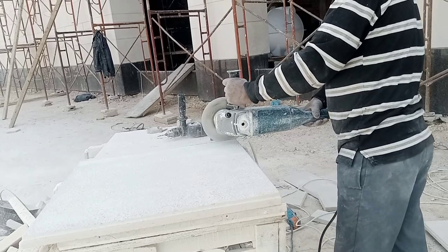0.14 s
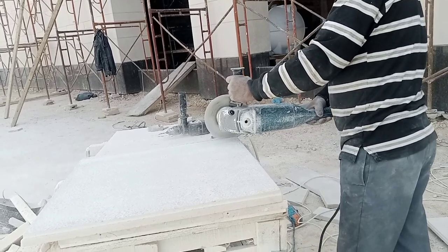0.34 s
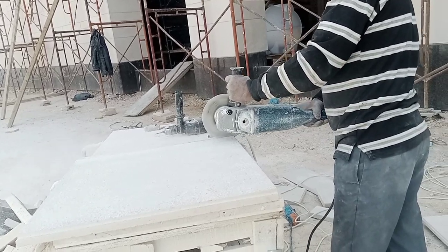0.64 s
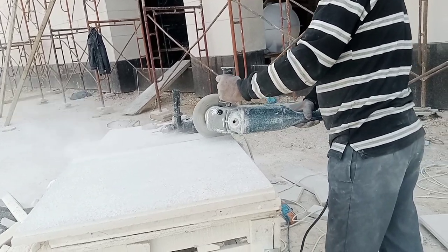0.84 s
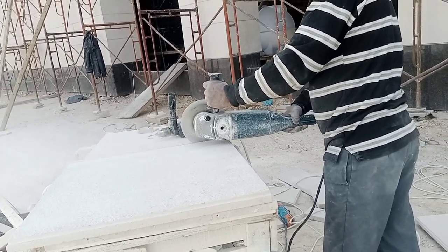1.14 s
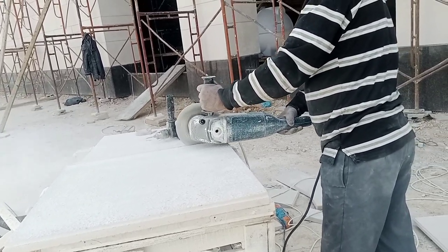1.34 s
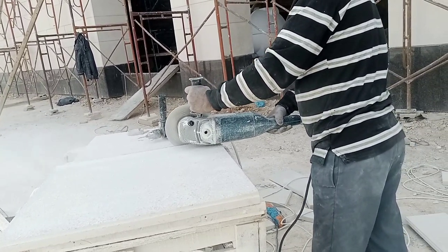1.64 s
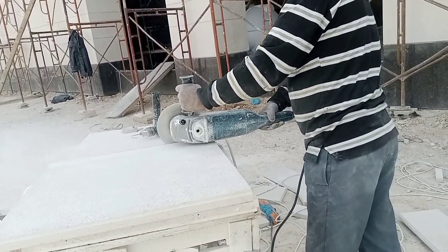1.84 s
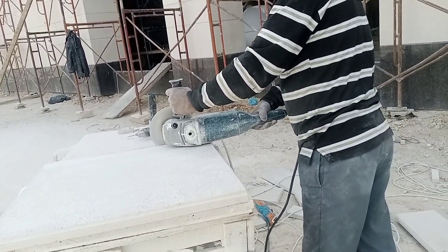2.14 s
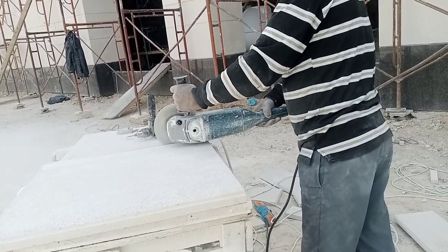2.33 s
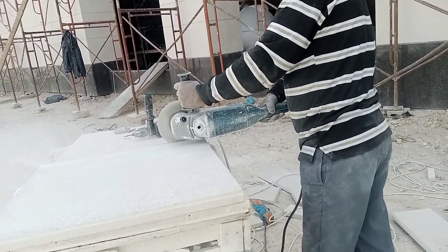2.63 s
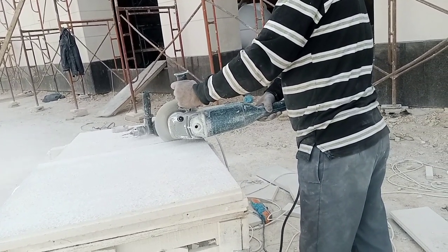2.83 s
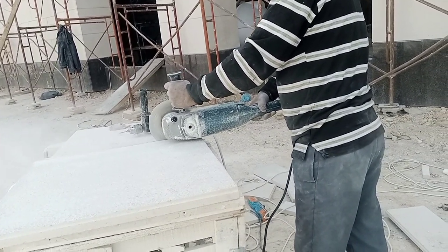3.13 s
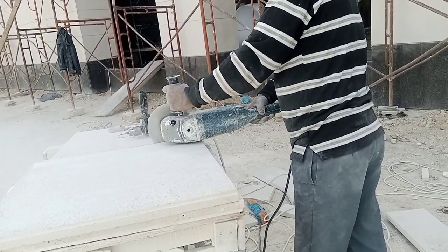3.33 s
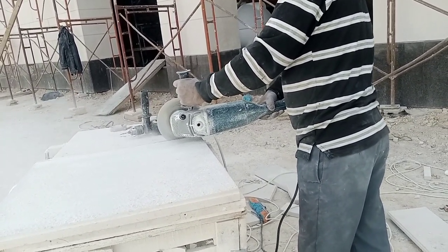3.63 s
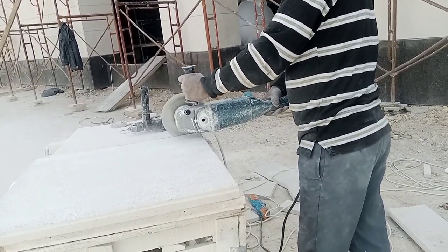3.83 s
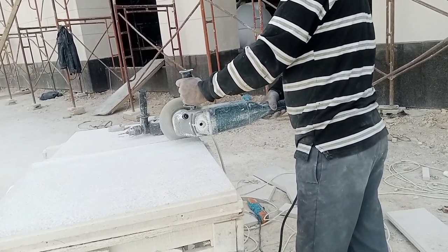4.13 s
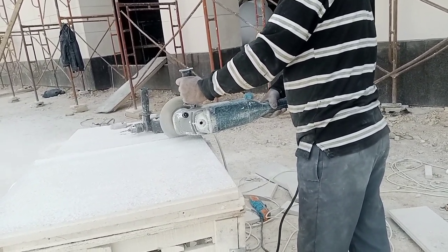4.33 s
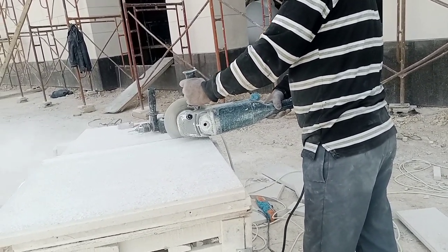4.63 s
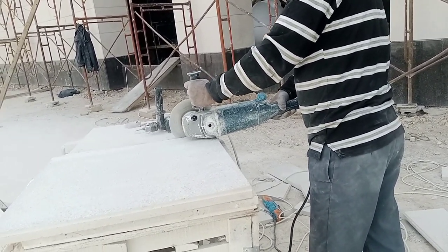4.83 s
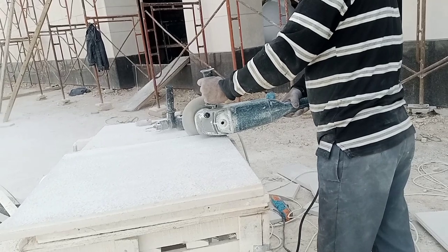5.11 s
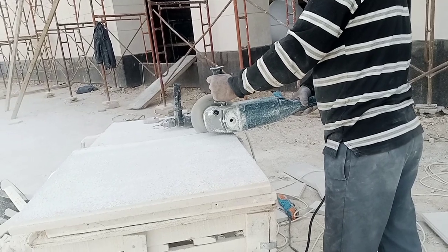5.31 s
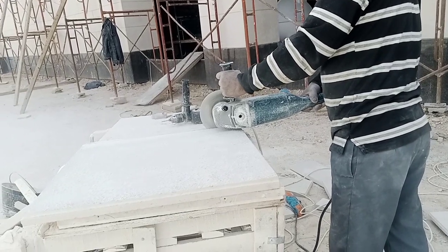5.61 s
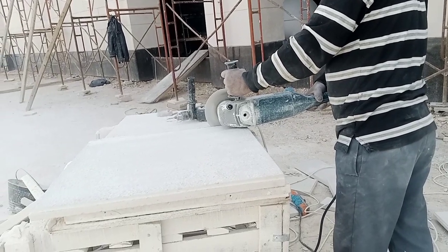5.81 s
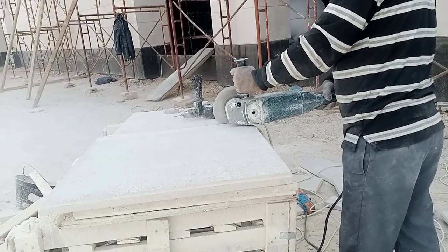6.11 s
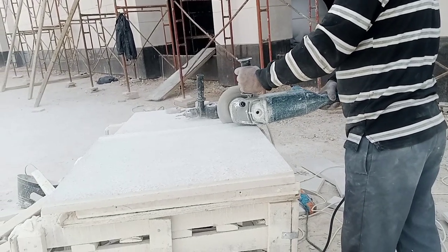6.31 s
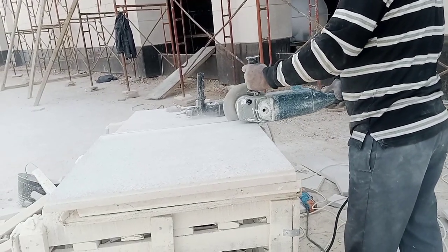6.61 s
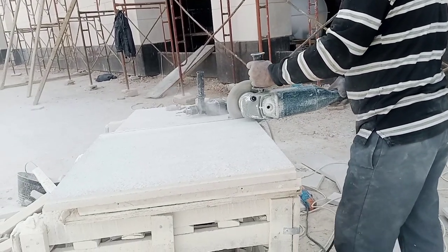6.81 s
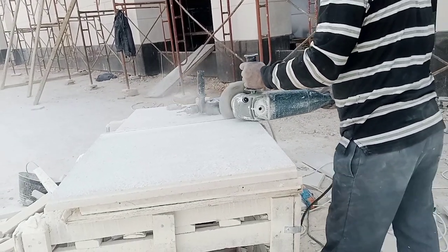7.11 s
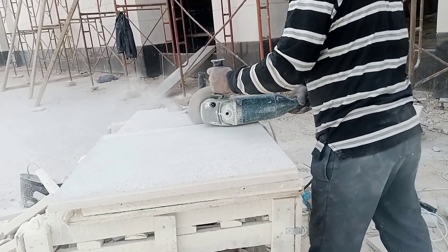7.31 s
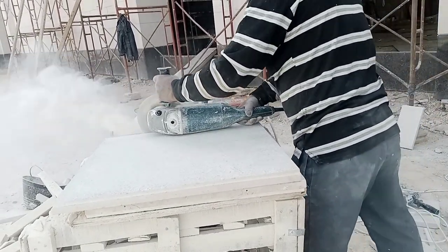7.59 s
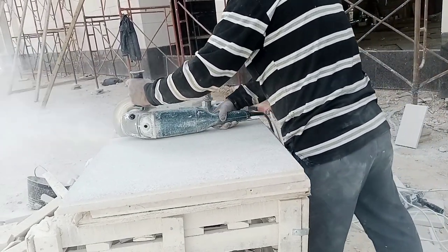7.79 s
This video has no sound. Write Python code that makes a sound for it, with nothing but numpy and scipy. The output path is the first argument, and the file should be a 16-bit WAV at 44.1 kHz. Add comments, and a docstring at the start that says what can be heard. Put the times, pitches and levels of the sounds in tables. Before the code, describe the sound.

A big angle grinder is already running against a stone slab, outdoors, close and dry in mono, loud and unbroken for about eight seconds. In the first 0.7 s the motor whine climbs, with short gliding whistles; then a hard push drags it down until about 2 s, the rasp buzzing roughly at the disc's turning rate over low knocking and slab drone. The blade rings thinly. From 2 to 5 s the pitch recovers and dips in gentle waves, with brief grittier skims near 2.2 and 3.35 s and a fine top hiss that fades before 5 s. From 5 s the load eases and the whine rises; after 6.4 s the disc comes free, the low knocking drops away, the motor races, and steel ringing and airy rush dominate. Around 7.4 s a dusty puff and brighter scrape replace the ringing, still racing at the end.

```python
"""Angle grinder on a stone slab

Outdoors, close and dry on one microphone channel: a big angle grinder works the edge of a stone slab.
Each push drags the motor towards a lower speed, and it runs up as the disc comes free.
Shaft, fan and gear teeth whine at multiples of the motor speed. The uneven rim scrapes almost the same
pattern every turn, so the rasp buzzes at the disc's rate; guard and housing colour it, slab and trestle
knock under it, the steel blade rings in the cut and on after it lifts free, and short whistles glide."""
import sys
import numpy as np
from scipy import signal
from scipy.fft import rfft, irfft, next_fast_len
from scipy.io import wavfile
from scipy.ndimage import uniform_filter1d, minimum_filter1d, map_coordinates

SR = 44100
rng = np.random.default_rng(int(sys.argv[2]) if len(sys.argv) > 2 else 0)


def generate_wav(sig):
    """Save sig (samples, or channels by samples) to the path in sys.argv[1] as 16-bit PCM at SR."""
    pcm = np.round(np.clip(np.atleast_2d(sig).T, -1, 1) * 32767).astype(np.int16)
    wavfile.write(sys.argv[1], SR, pcm)


N = 350595


def amp(db):
    """Decibels to gain."""
    return 10 ** (np.asarray(db) / 20)


def unit(x):
    """Scaled to rms 1."""
    return x / np.sqrt(np.mean(x ** 2) + 1e-20)


def curve(rows):
    """One value per sample from (time, value) rows, joined by straight lines."""
    times, values = np.transpose(rows)
    return np.interp(np.arange(N) / SR, times, values)


def wobble(rate):
    """A smooth random curve, rate knots a second."""
    knots = rng.standard_normal(int(N * rate / SR) + 4)
    return map_coordinates(knots, [np.arange(N) * rate / SR])


def held(start, end, ramp_s):
    """A gate 0-1 that opens around start and closes around end, each over ramp_s."""
    t = np.arange(N) / SR
    return np.clip(np.minimum(t - start, end - t) / ramp_s + 0.5, 0, 1)


def filtered(x, response):
    """x times a response of frequency."""
    m = next_fast_len(N + SR // 4)
    return irfft(rfft(x, m) * response(np.fft.rfftfreq(m, 1 / SR)), m)[:N]


def coloured(x, points):
    """x through a (frequency, level) spectrum that falls away past its ends, at rms 1."""
    f, db = np.transpose(points)

    def response(hz):
        skirts = np.minimum(1, np.minimum(hz / f[0], f[-1] / (hz + 1))) ** 4
        return amp(np.interp(np.log(hz + 1), np.log(f), db)) * skirts

    return unit(filtered(x, response))


def ringing(x, modes):
    """x through (frequency, width, level) resonances of alternating sign, at rms 1."""
    def response(f):
        total = 0
        for k, (hz, width, db) in enumerate(modes):
            damping = 1j * f * width
            total = total + (-1) ** k * amp(db) * damping / (hz * hz - f * f + damping)
        return total

    return unit(filtered(x, response))


def scrape(turns, repeat, wear_turns, size=512):
    """White rubbing noise; the share `repeat` comes round each turn and slowly wears into a new pattern."""
    keep = np.exp(-1 / max(wear_turns, 1))
    fresh = rng.standard_normal((int(turns[-1]) + 2, size))  # one row a turn, size points round the rim
    before = keep * rng.standard_normal((1, size))
    rim = signal.lfilter([np.sqrt(1 - keep ** 2)], [1, -keep], fresh, axis=0, zi=before)[0]
    pattern = unit(map_coordinates(rim.ravel(), [turns * size]))
    repeat = np.clip(repeat, 0, 1)
    return np.sqrt(repeat) * pattern + np.sqrt(1 - repeat) * rng.standard_normal(N)


def spray(patchy_db):
    """White noise in short-lived patches of random strength."""
    z = signal.stft(rng.standard_normal(N), nperseg=1024)[2]
    across_pitch = uniform_filter1d(rng.standard_normal(z.shape), size=4, axis=0)
    patches = uniform_filter1d(across_pitch, size=6, axis=1)
    return signal.istft(z * amp(patchy_db * unit(patches)), nperseg=1024)[1][:N]


def runout(turns, once, twice):
    """The disc is not quite true: it presses harder once and twice a turn."""
    angle = 2 * np.pi * turns + 0.5 * wobble(1.96)
    return 1 + once * np.sin(angle) + twice * np.sin(2 * angle)


def bite(disc, flicker_db):
    """Grains catch and break away: the scraping flickers on top of the disc's sway."""
    flicker = amp(flicker_db * (0.68 * wobble(25) + wobble(220)))
    return unit(runout(disc, once=0.083, twice=0.062) * flicker)


def tone(turns, flutter_db, smear):
    """A line of rms 1 that wavers in strength and phase."""
    phase = 2 * np.pi * (turns + rng.random()) + smear * wobble(40)
    return unit(amp(flutter_db * wobble(16)) * np.sin(phase))


# each change in how hard the worker leans on the disc: (time [s], load [0-1])
LEANING = [(0.0, 0.406), (0.665, 0.775), (0.79, 1.0), (1.254, 0.895), (1.625, 0.818), (2.092, 0.575),
           (2.953, 0.726), (3.377, 0.454), (4.209, 0.639), (4.921, 0.335), (5.578, 0.367), (6.387, 0.0),
           (7.343, 0.064)]
# the motor starts at START_HZ and settles towards FREE_HZ less SAG_HZ at full load, with the rotor's inertia
START_HZ, FREE_HZ, SAG_HZ, INERTIA_S = 231.8, 387.7, 243.1, 0.8
FIRM_LOAD, SEAT_S = 0.39, 0.12  # load at which the rim sits fully on the stone; time to seat or lift


def drive():
    """Motor speed in Hz and rim contact 0-1: each change of load draws the speed towards a new level."""
    t, speed_hz, load, before = np.arange(N) / SR, np.zeros(N), np.zeros(N), 0
    for start, now in LEANING:
        approach = 1 - np.exp(-np.maximum(t - start, 0) / INERTIA_S)
        speed_hz -= SAG_HZ * (now - before) * approach
        load[t >= start] = before = now
    speed_hz += FREE_HZ + (START_HZ - FREE_HZ) * np.exp(-t / INERTIA_S)
    seated = np.clip(load / FIRM_LOAD, 0, 1)
    return speed_hz, np.abs(uniform_filter1d(seated, size=int(SEAT_S * SR)))


# colour of the low bed under the bench: (frequency [Hz], relative level [dB])
RUMBLE_COLOUR = [(20, -7), (45, -9), (68, 1.5), (100, 1.5), (125, 7), (160, -2), (300, 5), (1000, -40)]


def rumble(contact):
    """Low noise, steadily coloured, that swells as the rim presses and wavers slowly."""
    level_db = -56.5 + 8.2 * (contact - 1) + 3.5 * wobble(7)
    return amp(level_db) * coloured(rng.standard_normal(N), RUMBLE_COLOUR)


# the rim's knocking at full contact, before the trestle: (multiple of the disc's rate, mid level [dB])
RIM_KNOCKS = [(3, -47), (4, -49.5), (5, -59.5), (6, -58), (7, -55.5), (8, -48), (9, -48.5), (10, -45),
              (11, -52.5), (12, -49), (13, -55.5), (18, -46.5)]
# how well slab and trestle radiate the knocking: (frequency [Hz], gain [dB])
TRESTLE_GAIN = [(140, -24), (195, -6.5), (222, 6.5), (238, 7), (265, -4), (350, -4.5), (400, 1), (450, -5),
                (505, 5.5), (570, -4.5), (800, -15), (925, -7), (980, 0.5), (1060, -1)]
KNOCK_SOFT_DB = 2  # loss per multiple as the contact lightens


def knocking(disc, contact):
    """The pressed rim knocks slab and trestle at low multiples of the disc's rate."""
    knock = np.zeros(N)
    for multiple, db in RIM_KNOCKS:
        level_db = db - KNOCK_SOFT_DB * multiple * (1 - contact) + 1.6 * wobble(2.5)
        knock += amp(level_db) * tone(round(multiple) * disc, flutter_db=1, smear=0.1)
    # each multiple swells as it glides through a resonance
    radiated = filtered(knock, lambda hz: amp(np.interp(hz, *np.transpose(TRESTLE_GAIN))))
    return contact * np.clip(2 * contact, 0, 1) * radiated


# each whine swells as its pitch glides through the resonances of the body
# the shaft's hum: (frequency [Hz], level [dB])
HUM_SWELL = [(190, -52.5), (225, -45.5), (242, -45.5), (254, -53.5), (265, -63), (300, -60), (335, -52.5),
             (367, -47.5)]
# the fan's whine, before the disc's sway: (frequency [Hz], level [dB])
FAN_SWELL = [(1900, -32.5), (2100, -29.5), (2300, -33), (2550, -29.5), (2780, -26), (2930, -24),
             (3100, -40), (3670, -36)]
# the gear's whine, before the disc's sway: (frequency [Hz], level [dB])
GEAR_SWELL = [(2650, -38), (3150, -32.5), (3400, -37), (3600, -43), (3860, -25.5), (4050, -46), (4300, -45)]
FAN_BLADES, PINION_TEETH, WHEEL_TEETH, SLOTS = 10, 14, 66, 16


def motor(shaft, disc, speed_hz, contact):
    """Unbalance hums; fan blades, gear teeth and armature slots whine, swayed by each turn of the disc."""
    def swell(table, multiple):
        return amp(np.interp(multiple * speed_hz, *np.transpose(table)))

    hum = swell(HUM_SWELL, 0.99) * tone(shaft, flutter_db=1.0, smear=0.08)
    fan = swell(FAN_SWELL, FAN_BLADES) * tone(FAN_BLADES * shaft, flutter_db=1.8, smear=0.35)
    gears = swell(GEAR_SWELL, PINION_TEETH) * tone(PINION_TEETH * shaft, flutter_db=1.2, smear=0.4)
    # the slots sing only while the motor draws current against the load
    slots = amp(-40.5) * contact * tone(SLOTS * shaft, flutter_db=2.0, smear=0.3)
    return hum + (fan + gears + slots) * runout(disc, once=0.38, twice=0.53)


# short whistles that glide and fade, mostly machine multiples swelling as they pass resonances:
# (start [s], end [s], start pitch [Hz], end pitch [Hz], level at mid-whistle [dB])
GLIDING_WHISTLES = [(0, 0.347, 1660, 1747, -32), (0.249, 0.702, 3480, 3697, -35),
                    (0.492, .75, 1660, 1690, -37.5), (1.079, 1.51, 1115, 1064, -38),
                    (2.3, 2.624, 1027, 1105, -37), (3.602, 4.1, 1705, 1804, -37.5),
                    (3.956, 4.644, 995, 952, -41), (5.946, 6.6, 3375, 3440, -30.5),
                    (7.202, 7.9, 1066, 994, -44)]


def whistles():
    """Short wavering tones, each gliding a little in pitch as it swells and fades."""
    t, out = np.arange(N) / SR, np.zeros(N)
    for start, end, start_hz, end_hz, db in GLIDING_WHISTLES:
        along = np.clip((t - start) / (end - start), 0, 1)
        hz = start_hz + (end_hz - start_hz) * along
        swell = np.sqrt(np.abs(np.sin(np.pi * along)))
        out += amp(db) * swell * tone(np.cumsum(hz) / SR, flutter_db=4.5, smear=0.46)
    return out


# stretches in which the steel blade rings strongly, in the cut and on after it lifts free:
# (start [s], end [s], strength [0-1])
RINGING_STRETCHES = [(-0.2, 2.35, 0.43), (2.92, 3.55, 0.46), (4.85, 5.28, 0.45), (5.28, 5.85, 0.68),
                     (5.85, 6.5, 1), (6.5, 7.38, 0.9)]


def blade_strength():
    """Strength 0-1 of the blade's ring, ramped in and out over 0.12 s."""
    return sum(strength * held(start, end, 0.12) for start, end, strength in RINGING_STRETCHES)


# moments when the rim skims instead of biting, with less dust and more grit: (start [s], end [s])
SKIM_MOMENTS = [(2.07, 2.3), (3.27, 3.44)]


def skimming():
    """Gate 0-1 of the rim's skims, ramped over 0.086 s."""
    return sum(held(start, end, 0.086) for start, end in SKIM_MOMENTS)


# colour of the top hiss: (frequency [Hz], relative level [dB])
HISS_COLOUR = [(13200, -33), (13900, -20), (14300, -7), (14650, 0), (15000, 0), (15500, -2), (16000, -9)]
# course of the top hiss, before the trim: (time [s], level [dB])
HISS_COURSE = [(0.0, -41), (0.13, -43), (2.68, -42), (4.56, -36), (4.96, -55), (7.88, -56), (7.95, -56)]
HISS_TRIM_DB = 0.8


def top_hiss():
    """A thin band of nearly even noise at the very top."""
    return amp(HISS_TRIM_DB + curve(HISS_COURSE)) * coloured(spray(patchy_db=0.5), HISS_COLOUR)


# colour of the dust: (frequency [Hz], relative level [dB])
DUST_COLOUR = [(6500, -11), (7800, 2.5), (8600, 3), (9100, -4), (9700, -6.5), (10100, -12.5),
               (10800, -13.5), (11500, -19.5), (12500, -20.5), (13600, -26), (16000, -32)]
DUST_DB, DUST_CONTACT_DB, DUST_SKIM_DB = -41, 4, -4.5  # disc free; added by full contact; by a skim
PUFF_START_S, PUFF_END_S, PUFF_DB = 7.2, 7.62, 4  # the freed disc brushes the stone: a puff of dust


def dust(contact, skim):
    """Thrown dust is a patchy spray of high noise, stronger under contact and in the puff."""
    puff = held(PUFF_START_S, PUFF_END_S, ramp_s=0.15)
    level_db = DUST_DB + DUST_CONTACT_DB * contact + DUST_SKIM_DB * skim + PUFF_DB * puff
    return amp(level_db) * coloured(spray(patchy_db=2.5), DUST_COLOUR)


# colour of the fan air: (frequency [Hz], relative level [dB])
AIR_COLOUR = [(250, -31), (1800, -21), (2500, -6), (2850, 0.5), (3150, -1.5), (3400, 0.5), (3640, -15),
              (3880, -2.5), (4020, -2), (4230, -28), (5200, -32)]
AIR_DB, AIR_RING_DB = -23.5, 3  # base level; a ringing blade feeds the 3 kHz rush
RACING_HZ, RACING_AIR_DB_PER_HZ = 308, 0.04  # above this motor speed the fan air grows


def fan_air(disc, speed_hz, contact, ring):
    """The fan's rush is noise that grows as the motor races and partly repeats each turn."""
    racing_hz = np.maximum(speed_hz - RACING_HZ, 0)
    level_db = AIR_DB + RACING_AIR_DB_PER_HZ * racing_hz + AIR_RING_DB * ring
    return amp(level_db) * coloured(scrape(disc, 0.1 * contact + 0.13, wear_turns=12.6), AIR_COLOUR)


# colour of the grit: (frequency [Hz], relative level [dB])
GRIT_COLOUR = [(4400, -24), (4750, -1.5), (5100, -7.5), (5500, -2), (5900, 1), (6350, 1.5), (6900, -0.5),
               (7300, -2.5), (7900, -19), (9000, -37.5)]
GRIT_DB, GRIT_SKIM_DB = -28, 2  # base level; added by a skim


def grit(disc, contact, skim):
    """Grit gives a wavering high scrape, stronger in a skim."""
    level_db = GRIT_DB + GRIT_SKIM_DB * skim + 0.74 * wobble(3.73)
    return amp(level_db) * coloured(scrape(disc, 0.17 * contact, wear_turns=6.6), GRIT_COLOUR)


# bending modes of the steel blade: (frequency [Hz], width [Hz], relative level [dB])
BLADE_MODES = [(6310, 260, -10.5), (6675, 137, -2), (7616, 200, -10)]
RING_DB, RING_IDLE_DB = -23, -51.5  # ring at full strength, over the constant idle ring


def blade_ring(disc, strength):
    """Noise excites the blade's bending modes, loud in its ringing stretches and faint between."""
    excited = ringing(scrape(disc, 0.11, wear_turns=8.8), BLADE_MODES)
    blade = coloured(excited, [(5000, -10), (6200, -1), (7700, -1.5), (8600, -21)])
    return (amp(RING_DB) * strength + amp(RING_IDLE_DB)) * blade


# colour of the bright rasp at the open side: (frequency [Hz], relative level [dB])
OPEN_COLOUR = [(3300, -10), (3680, 6.5), (4150, 3.5), (4400, 0), (4650, 1.5), (5000, -20)]
OPEN_DB, OPEN_RING_DB = -30.5, -5.5  # base level; a ringing blade thins it
GRAZE_S, GRAZE_RISE_S, GRAZE_DB = 7.42, 0.2, 7  # the racing disc grazes the slab's face; how fast, how much


def bright_rasp(disc, ring):
    """The open side lets out a bright scrape, stronger as the disc grazes the slab's face."""
    level_db = OPEN_DB + GRAZE_DB * held(GRAZE_S, np.inf, GRAZE_RISE_S) + OPEN_RING_DB * ring
    return amp(level_db) * coloured(scrape(disc, 0.12, wear_turns=5.7), OPEN_COLOUR)


# colour of the slab: (frequency [Hz], relative level [dB])
SLAB_COLOUR = [(90, -31), (165, -20.5), (210, -4), (300, -3), (400, 3.5), (510, 2), (620, -0.5), (750, 0.5),
               (880, -6), (1250, -9.5), (1700, -14), (2100, -17)]
SLAB_DB, SLAB_CONTACT_DB, SLAB_RING_DB = -45, 6.5, -3.5  # disc free; added by contact; by the blade's ring


def slab_drone(disc, contact, ring):
    """The slab answers the scraping with a low drone, thinned while the blade rings in contact."""
    level_db = SLAB_DB + SLAB_CONTACT_DB * contact + SLAB_RING_DB * ring * contact
    return amp(level_db) * coloured(scrape(disc, 0.32 * contact, wear_turns=7.6), SLAB_COLOUR)


# resonances of the gear housing: (frequency [Hz], width [Hz], relative level [dB])
HOUSING_MODES = [(975, 29, -0.5), (1109, 64, 0.5), (1410, 88, -1), (1818, 75, 2.5)]
HOUSING_DB, HOUSING_CONTACT_DB = -40, 3.5  # disc free; added by full contact
HOUSING_FOLLOWS = 0.37  # share of the rasp's swings that the housing takes part in


def housing_rasp(disc, contact, rasp_db):
    """The scraping rings the gear housing's resonances."""
    swings_db = rasp_db - rasp_db.mean()
    level_db = HOUSING_DB + HOUSING_CONTACT_DB * contact + HOUSING_FOLLOWS * swings_db
    rung = ringing(scrape(disc, 0.23 * contact + 0.14, wear_turns=8.2), HOUSING_MODES)
    return amp(level_db) * coloured(rung, [(850, 0), (1950, 0)])


# colour of the guard: (frequency [Hz], relative level [dB])
GUARD_COLOUR = [(900, -38), (1600, -22.5), (1800, -11), (1980, -10), (2200, 0), (2300, 2.5), (2450, -2.5),
                (2650, 2.5), (2850, -12.5), (3200, -23), (4200, -31)]
GUARD_TRIM_DB = -0.37


def guard_rasp(disc, contact, rasp_db):
    """The guard colours the rim's scraping into a mid rasp."""
    rubbed = scrape(disc, 0.25 * contact, wear_turns=8.9)
    return amp(GUARD_TRIM_DB + rasp_db) * coloured(rubbed, GUARD_COLOUR)


# course of the guard's rasp, before its trim: (time [s], level [dB])
RASP_COURSE = [(0.0, -19), (0.42, -22), (0.68, -19.5), (1.78, -23.5), (2.88, -20), (3.3, -20.5),
               (3.41, -27.5), (3.43, -21), (4.82, -21), (6.45, -26), (6.51, -22.5), (7.06, -23.5),
               (7.9, -20.5)]


def grinding(disc, speed_hz, contact):
    """The rim scrapes the slab: drone below, rasp of housing and guard, then air, grit, ring and dust."""
    rasp_db = curve(RASP_COURSE)
    strength = blade_strength()
    ring = strength ** 2  # how far the blade's ring sways the other layers
    skim = skimming()
    treble = top_hiss() + dust(contact, skim) + fan_air(disc, speed_hz, contact, ring)
    treble += grit(disc, contact, skim) + blade_ring(disc, strength) + bright_rasp(disc, ring)
    low = slab_drone(disc, contact, ring) + housing_rasp(disc, contact, rasp_db)
    guard = bite(disc, flicker_db=1.03) * guard_rasp(disc, contact, rasp_db)
    return low + guard + bite(disc, flicker_db=0.74) * treble


def scene():
    """The load sets the motor's speed, whose angle drives the tones; the bevel gear turns the disc."""
    speed_hz, contact = drive()
    shaft = np.cumsum(speed_hz * (1 + 0.00078 * wobble(12))) / SR  # in turns
    disc = shaft * PINION_TEETH / WHEEL_TEETH
    bench = rumble(contact) + knocking(disc, contact)
    machine = motor(shaft, disc, speed_hz, contact)
    return (bench + machine + whistles() + grinding(disc, speed_hz, contact))[None]


TOP_HZ = 15550  # the microphone channel's band limit


def record(dry):
    """A fast limiter rounds the highest peaks; nothing is kept above the band limit."""
    needed = np.minimum(1, 0.58 / (np.abs(dry[0]) + 1e-9))
    gain = uniform_filter1d(minimum_filter1d(needed, size=151), size=151)
    return filtered(dry[0] * gain, lambda hz: hz < TOP_HZ)[None]


dry = scene()
out = record(dry)
generate_wav(out)
```